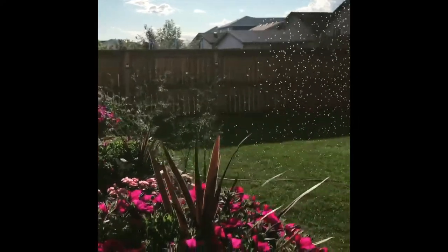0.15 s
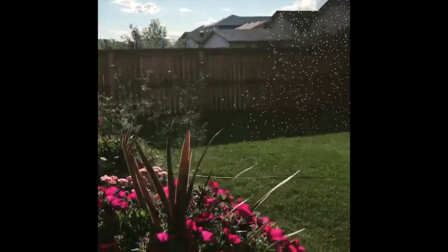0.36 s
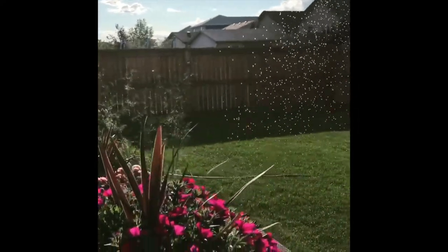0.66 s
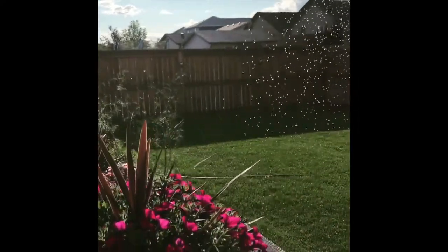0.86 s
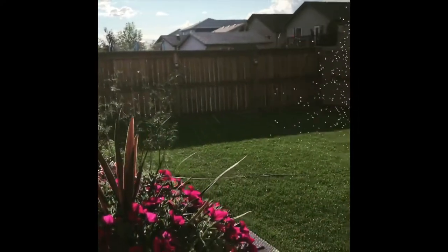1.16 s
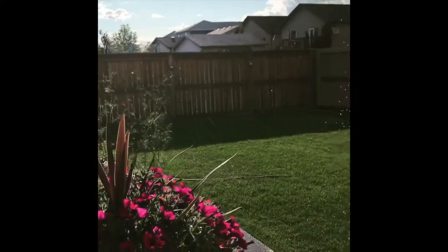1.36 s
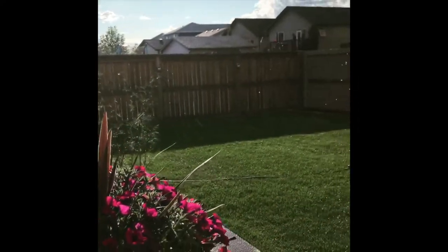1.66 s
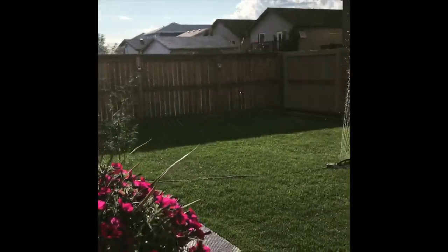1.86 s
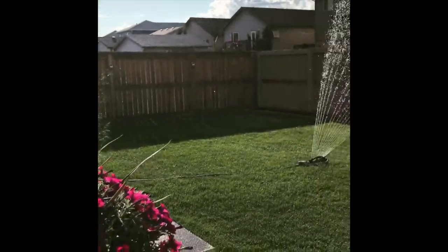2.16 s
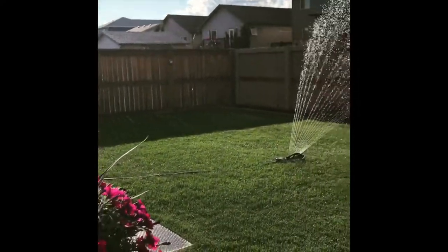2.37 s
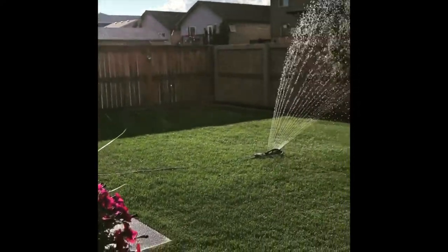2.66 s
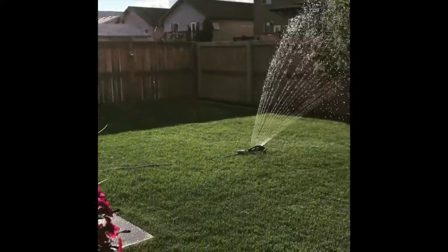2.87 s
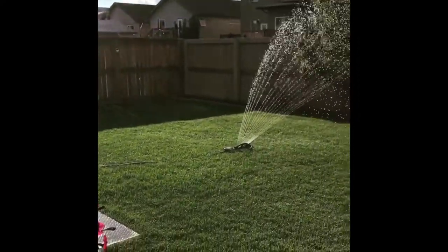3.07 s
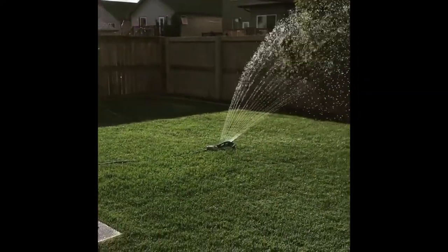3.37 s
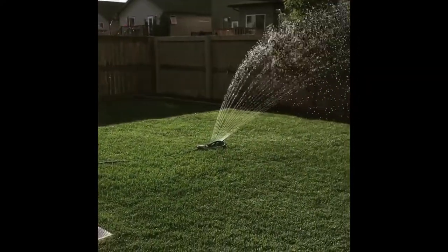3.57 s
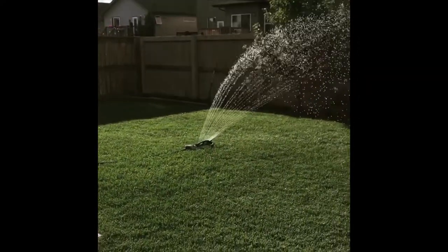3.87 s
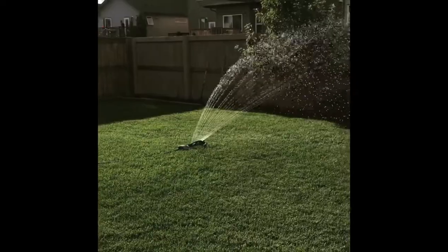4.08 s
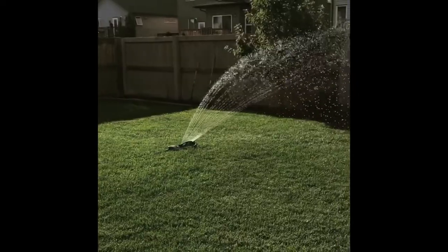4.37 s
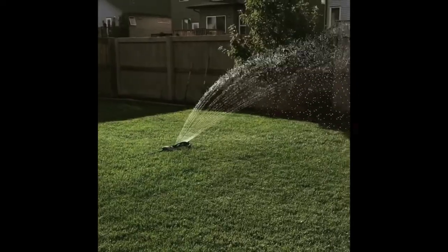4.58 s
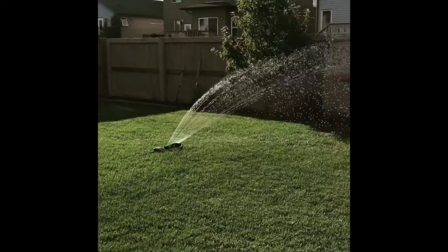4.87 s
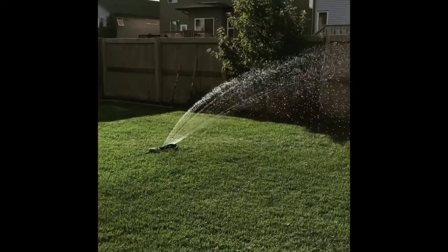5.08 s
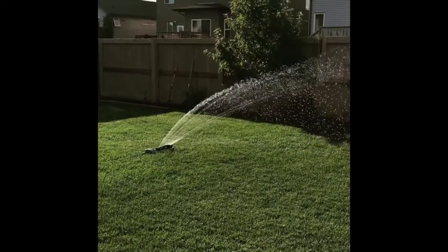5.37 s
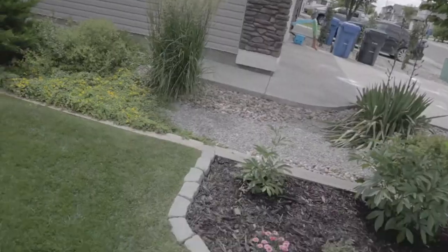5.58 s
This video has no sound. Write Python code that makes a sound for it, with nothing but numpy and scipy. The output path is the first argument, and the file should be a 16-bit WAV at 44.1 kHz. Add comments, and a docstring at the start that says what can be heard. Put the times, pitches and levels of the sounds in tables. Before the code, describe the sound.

A lawn sprinkler hisses faintly and steadily in a backyard from the start, with a fine fizz of spray. For the first second or so, water patters on plants and taps dully on broad leaves, then the patter thins as it moves onto grass. Small bright drops tick close to the microphone, frequent until about 1.8 seconds, sparse in the middle, and more frequent again around 5 seconds. Underneath is a very faint town rumble and a distant small engine, which sinks after about 3.2 seconds. All of this is quiet and in mono. At 5.3 seconds the yard cuts out, and one very short, sharp electrical click snaps in the silence, far louder than anything else. From about 5.4 seconds a wider, duller front yard ambience takes over briefly, a soft low background noise with a short rustle and a few tiny ticks at the sides.

```python
"""A faint hiss of water jets and a patter of drops: an oscillating lawn sprinkler in a backyard. Spray patters
on grass and slaps broad leaves, a few drops tick close to the microphone, and far off a small engine drones
over the town's rumble. At 5.3 s the yard drops out and a full-scale click snaps in the silence. A wide, duller
front yard takes over, with a low murmur and a short rustle."""
import sys
import numpy as np
from scipy import signal
from scipy.fft import rfft, irfft, next_fast_len
from scipy.io import wavfile

SR = 44100
rng = np.random.default_rng(int(sys.argv[2]) if len(sys.argv) > 2 else 0)


def wrap_up_sound(samples):
    """Save the sound to the file named by the first command line argument, as 16-bit audio."""
    columns = np.atleast_2d(samples).T
    # keep every value between -1 and 1, then stretch to whole-number steps
    tamed = np.clip(columns, -1, 1)
    steps = np.round(tamed * 32767).astype(np.int16)
    wavfile.write(sys.argv[1], SR, steps)


N = 252242

# The town, far off. Each row: frequency in Hz, relative level in dB per Hz.
TOWN_SPECTRUM = [(21, -41), (36, 0), (80, 0.5), (107, -12.5), (128, -7), (183, -8), (203, -12.5), (280, -3),
                 (312, -12), (387, -8), (411, -11.5), (444, -14), (969, -12), (1400, -22), (1820, -47),
                 (3080, -120)]
# Its rumble over time. Each row: time in seconds, level in dB.
TOWN_LEVELS = [(0.0, -62), (3.15, -61.5), (3.45, -64.5), (4.49, -63), (5.31, -63.5)]
# Tones in the rumble. Each row: pitch in Hz, wavers per second, level in dB against the rumble.
TOWN_TONES = [(78.6, 3, -10.5), (139.7, 7.6, -14.5), (182, 8.7, -11), (229, 7.3, -12), (284, 6.2, -9),
              (1117, 5.7, -21)]
# The distant engine, sinking after three seconds.
# Each row: time in seconds, base level in dB, lift of the top overtones in dB.
ENGINE_LEVELS = [(0.0, -74, -4), (0.9, -71.5, -3.5), (1.55, -74.5, -3.5), (1.74, -68.5, -2),
                 (1.82, -74, -2), (2.06, -76, -1), (2.17, -71.5, 3.5), (2.26, -73.5, 0), (2.75, -72.5, -2),
                 (3.22, -74, -2), (3.4, -81.5, -6), (5.31, -78, -4.5)]
# The colour of its exhaust. Each row: frequency in Hz, gain in dB.
EXHAUST_COLOUR = [(590, -9), (680, -3), (760, -9.5), (820, -1.5), (950, 1.5), (1040, 3), (1085, -11),
                  (1130, -8)]

# The front yard's murmur in the middle, its murmur at the sides, and its rustle.
# Each row: frequency in Hz, relative level in dB per Hz.
MURMUR_MID_SPECTRUM = [(18, -38), (30, -10), (63, -3), (146, -8.5), (528, -9.5), (744, -15.5),
                       (1410, -23.5), (1510, -24), (2030, -21), (3790, -33.5), (5000, -38), (6500, -71),
                       (11000, -120)]
MURMUR_SIDE_SPECTRUM = [(18, -69), (30, -34), (210, 0), (250, -5), (575, -2), (654, -4), (1950, -6),
                        (5000, -14), (6500, -43), (11000, -120)]
RUSTLE_SPECTRUM = [(1760, -29), (3000, -4), (3250, -5), (3850, -4), (4560, -6), (7550, -8), (10200, -7),
                   (12800, -15), (16600, -50), (22000, -120)]
# Ticks at the sides of the front yard. Each row: start in seconds, snap level in dB, pitch in Hz.
SIDE_TICKS = [(5.553, -57, 3790), (5.675, -52, 9500), (5.697, -45, 10010)]
# The buzz that ends the click. Each row: frequency in Hz, level in dB before clipping.
CLICK_PARTIALS = [(1250, -9.5), (1900, -13.5), (3100, -11), (4800, -6.5), (6900, -9.5), (8450, -14.5),
                  (11500, -9.5), (14000, -8.5)]

# The hiss of the jets. Each row: frequency in Hz, relative level in dB per Hz.
JET_SPECTRUM = [(650, -24), (1100, -3), (1360, -9.5), (1470, -3.5), (1820, -6.5), (2180, -6.5), (2360, -10),
                (2610, -7.5), (2820, -9), (4940, -12), (5580, -9.5), (10300, -15), (12400, -12),
                (15100, -15.5), (16000, -22)]
# The jets, louder as the fan of water leans toward the microphone. Each row: time in seconds, level in dB.
JET_LEVELS = [(0.0, -64.5), (0.49, -62), (0.83, -61.5), (1.27, -62.5), (1.68, -65.5), (3.15, -65.5),
              (4.49, -64), (5.31, -63.5)]
# Spray landing on the plants, then moving off onto the grass. Each row: time in seconds, level in dB.
PATTER_LEVELS = [(0.0, -64.5), (0.49, -61), (0.99, -65.5), (1.27, -73.5), (1.48, -79), (1.68, -71.5),
                 (3.15, -71), (3.45, -75), (4.49, -71.5), (5.31, -75)]
# Drops close to the microphone. Each row: start in seconds, snap level in dB, pitch in Hz.
NEAR_DROPS = [(0.0757, -39.5, 15100), (0.1131, -42, 9300), (0.2024, -41, 9540), (0.223, -38.5, 9640),
              (0.3953, -32, 9900), (0.613, -33.5, 8550), (0.6524, -40, 8650), (0.7791, -43, 13900),
              (0.851, -41, 12900), (1.037, -40.5, 6160), (1.133, -44, 7310), (1.3295, -34, 6920),
              (1.3603, -44, 12400), (1.4915, -42, 12600), (1.787, -37, 12600), (2.1959, -47, 12780),
              (3.1348, -47, 8200), (3.3218, -48, 6380), (3.4036, -41.5, 10900), (3.722, -44, 11800),
              (4.0602, -41.5, 8750), (4.222, -44, 9920), (4.7784, -41, 11500), (4.788, -38, 10960),
              (4.7964, -41.5, 8740), (4.8419, -38, 11500), (5.004, -41, 13100), (5.1287, -37, 12900),
              (5.1793, -38.5, 9870)]
# Duller taps on broad leaves. Each row: start in seconds, peak in dB, centre frequency in Hz.
LEAF_TAPS = [(0.0662, -49, 2550), (0.3354, -53, 2990), (0.3727, -47, 3940), (0.5012, -50, 2840),
             (0.643, -47, 3010), (0.694, -48, 4020), (0.7776, -52, 2960), (0.9132, -50, 2690),
             (0.9376, -48.5, 2793), (1.0151, -51, 3150), (1.0883, -51, 4060), (4.2812, -51.5, 3470),
             (4.6259, -48, 3800)]

BACKYARD_ENDS_S, CLICK_S, FRONT_STARTS_S = 5.324, 5.3603, 5.419
DROP_SAMPLES = 1500


def from_db(db):
    return 10 ** (np.asarray(db) / 20)


def unit_rms(x):
    return x / np.sqrt(np.mean(x ** 2) + 1e-20)


def curves(rows):
    """One curve over time for each column after the seconds."""
    seconds, *columns = np.transpose(rows)
    return [np.interp(np.arange(N) / SR, seconds, column) for column in columns]


def drift(rate_hz):
    """A slow random wander of spread 1."""
    pole = np.exp(-2 * np.pi * rate_hz * 40 / SR)   # one step per 40 samples
    slow = signal.lfilter([1], [1, -2 * pole, pole ** 2], rng.standard_normal(N // 40 + 2002))[2000:]
    return np.interp(np.arange(N) / 40, np.arange(len(slow)), unit_rms(slow))


def resonate(x, hz, width_hz):
    """A two-pole resonance with gain 1 at its peak."""
    r, w = np.exp(-np.pi * width_hz / SR), 2 * np.pi * hz / SR
    return signal.lfilter(np.array([1, 0, -1]) * (1 - r * r) / 2, [1, -2 * r * np.cos(w), r * r], x + 1e-18)


def ring(impacts, hz, cycles):
    """Each impact rings a sine that falls 60 dB in so many cycles."""
    r, w = from_db(-60 * hz / (cycles * SR)), 2 * np.pi * hz / SR
    return signal.lfilter([0, np.sin(w)], [1, -2 * r * np.cos(w), r * r], impacts + 1e-18)


def coloured_noise(spectrum, flicker_db, patchy_db=0.0):
    """Noise of rms 1 whose level flickers as a whole and, if patchy, in bands 1400 Hz wide."""
    hz, level_db = np.transpose(spectrum)
    size = next_fast_len(N)
    bin_hz = np.maximum(np.arange(size // 2 + 1) * SR / size, 1)
    shape = from_db(np.interp(np.log(bin_hz), np.log(hz), level_db, left=-90, right=-90))
    noise = rfft(rng.standard_normal(size)) * shape
    patch = (bin_hz // 1400).astype(int) % (5 if patchy_db else 1)
    parts = [irfft(noise * (patch == k), size)[:N] * from_db(patchy_db * drift(35))
             for k in range(patch.max() + 1)]
    return unit_rms(sum(parts) * from_db(flicker_db * drift(16.6)))


def shower(per_s, low_hz, high_hz, cycles, spread_db):
    """Random drops of uneven size, each ringing briefly at one of 16 pitches; rms 1."""
    sizes = from_db(spread_db * np.minimum(rng.exponential(1, N), 5)) * rng.choice([-1, 1], N)
    impacts = sizes * (rng.random(N) < per_s / SR)
    pitches, choice = np.geomspace(low_hz, high_hz, num=16), rng.integers(0, 16, N)
    return unit_rms(sum(ring(impacts * (choice == k), hz, cycles) for k, hz in enumerate(pitches)))


def drop_ticks(rows, cycles, splash_ms, splash_db=-18):
    """A drop snaps at its pitch and leaves a short splash, broadly coloured around it."""
    out, t = np.zeros(N), np.arange(DROP_SAMPLES) / SR
    bright_noise = np.diff(rng.standard_normal((len(rows), len(t) + 1)), axis=1)
    for (start_s, snap_db, hz), noise in zip(rows, bright_noise):
        snap = np.sin(2 * np.pi * hz * t) * from_db(-60 * t * hz / cycles)
        splash = unit_rms(resonate(noise, .85 * hz, 5000)) * np.exp(-1000 * t / splash_ms)
        at = round(start_s * SR)
        out[at:at + len(t)] += from_db(snap_db) * (snap + from_db(splash_db) * splash)[:N - at]
    return out


def town_rumble(level_db):
    """The far town arrives as low, flickering noise."""
    return from_db(level_db) * coloured_noise(TOWN_SPECTRUM, flicker_db=1.5)


def town_hum(rumble_db):
    """Narrow tones in the far rumble waver in level and phase."""
    phase_per_hz = 2 * np.pi * np.arange(N) / SR
    tones = sum(from_db(db + 2.9 * drift(rate)) * np.sin(hz * phase_per_hz + 1.35 * drift(rate))
                for hz, rate, db in TOWN_TONES)
    return from_db(rumble_db) * np.sqrt(2) * tones


def far_engine(firing_hz=45.1, gust_db=1.1):
    """Overtones of the firing rate in the exhaust's band; echoes and moving air make each one waver."""
    level_db, lift_db = curves(ENGINE_LEVELS)
    firing_phase = 2 * np.pi * firing_hz * np.arange(N) / SR
    hz, exhaust_db = np.transpose(EXHAUST_COLOUR)
    drone = 0
    for order in range(13, 26):
        lift_share = np.clip((order - 18) / 4, -.5, 1)   # top overtones swell as the lower ones sink
        colour_db = np.interp(order * firing_hz, hz, exhaust_db) + lift_share * lift_db
        gain = from_db(colour_db + 3.2 * drift(3.5))
        drone += gain * np.sin(order * firing_phase + 1.47 * drift(4.5) + 2 * np.pi * rng.random())
    return from_db(level_db + gust_db * drift(10)) * drone


def front_yard(top_hz=13100):
    """In mid-side stereo: murmur and a faint whistle mostly central, rustle and ticks mostly out wide."""
    rustle_db, = curves([(5.403, -77.5), (5.43, -65), (5.485, -65), (5.512, -77.5)])   # seconds, dB
    mid = from_db(-55) * coloured_noise(MURMUR_MID_SPECTRUM, flicker_db=1.0)
    mid += from_db(rustle_db) * coloured_noise(RUSTLE_SPECTRUM, flicker_db=1.0)
    mid += from_db(-75) * unit_rms(resonate(rng.standard_normal(N), hz=2030, width_hz=60))   # whistle
    side = from_db(-61) * coloured_noise(MURMUR_SIDE_SPECTRUM, flicker_db=1.5)
    side += from_db(rustle_db + 8) * coloured_noise(RUSTLE_SPECTRUM, flicker_db=1.0)
    side += drop_ticks(SIDE_TICKS, cycles=12.0, splash_ms=3.0)
    lowpass = signal.ellip(8, .5, 40, top_hz, fs=SR, output="sos")
    return signal.sosfilt(lowpass, np.array([mid + side, mid - side]))


def full_scale_click(pinned_ms=.745, buzz_ms=.616, edge_ms=.041, rail=1.03):
    """The signal is pinned at the negative rail, then buzzes at full scale and stops dead."""
    ms = 1000 * (np.arange(N) / SR - CLICK_S)
    release_ms = ms - pinned_ms
    pinned = np.clip(ms / edge_ms + 0.17, 0, 1) * np.clip(.25 - release_ms / edge_ms, 0, 1)
    buzz = sum(from_db(db) * np.sin(2 * np.pi * hz * release_ms / 1000) for hz, db in CLICK_PARTIALS)
    buzz_on = np.clip(release_ms / 0.097, 0, 1) * np.clip((buzz_ms - release_ms) * SR / 1000, 0, 1)
    return np.clip(buzz, -.85, 1) * buzz_on - rail * pinned


def leaf_taps(decay_ms=5.0, q=1.66):
    """A heavy drop slaps a nearby leaf: a puff of noise in one broad resonance."""
    out, t = np.zeros(N), np.arange(DROP_SAMPLES) / SR
    for start_s, peak_db, hz in LEAF_TAPS:
        slap = rng.standard_normal(len(t)) * np.exp(-1000 * t / decay_ms)
        puff = resonate(resonate(slap, hz, hz / q), hz, hz / q)
        at = round(start_s * SR)
        out[at:at + len(t)] += from_db(peak_db) * puff / np.abs(puff).max()
    return out


def sprinkler():
    """Jets hiss, fine spray fizzes, bright droplets crackle; water spatters close and patters on plants."""
    (jet_db,), (patter_db,) = curves(JET_LEVELS), curves(PATTER_LEVELS)
    hiss = from_db(jet_db) * coloured_noise(JET_SPECTRUM, flicker_db=0.5, patchy_db=1.5)
    fizz = from_db(jet_db - 10) * shower(2000, 3900, 15000, cycles=5.7, spread_db=3.5)
    spatter = from_db(patter_db - 7) * shower(500, 3900, 14000, cycles=6.8, spread_db=3.5)
    crackle = from_db(jet_db - 14) * shower(60, 8000, 15500, cycles=16.0, spread_db=3.0)
    drops_per_s = 1500 * from_db(2.2 * drift(14))
    patter = from_db(patter_db) * shower(drops_per_s, 1285, 4950, cycles=9.4, spread_db=2.5)
    return hiss + fizz + spatter + crackle + patter


def scene():
    """The backyard, in mono, stops; the click snaps in the gap; the front yard opens in stereo."""
    t = np.arange(N) / SR
    town_db, = curves(TOWN_LEVELS)
    backyard = sprinkler() + town_rumble(town_db)
    backyard += drop_ticks(NEAR_DROPS, cycles=13.0, splash_ms=7.4) + leaf_taps()
    backyard += far_engine() + town_hum(town_db)
    backyard_on = np.clip((BACKYARD_ENDS_S - t) / .0015, 0, 1)
    front_on = np.clip((t - FRONT_STARTS_S) / .009, 0, 1) ** 2
    return backyard * backyard_on + full_scale_click() + front_yard() * front_on


def record(dry, cutoff_hz=16050):
    """The top of the treble is cut steeply."""
    return signal.sosfiltfilt(signal.ellip(8, .2, 30, cutoff_hz, fs=SR, output="sos"), dry)


dry = scene()
out = record(dry)
wrap_up_sound(out)
```